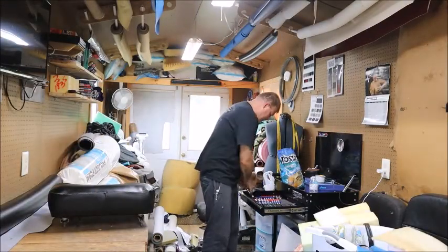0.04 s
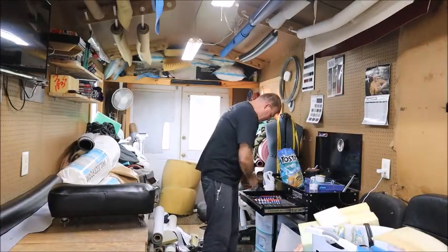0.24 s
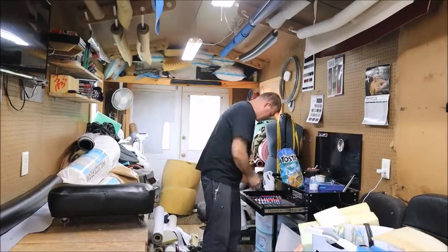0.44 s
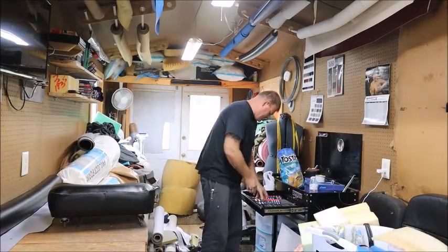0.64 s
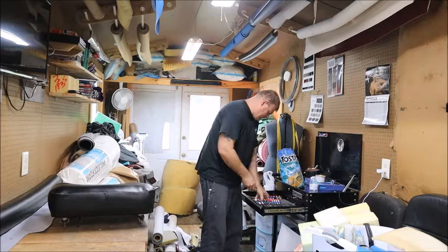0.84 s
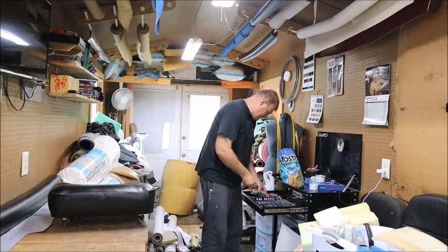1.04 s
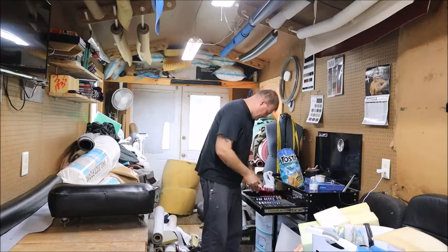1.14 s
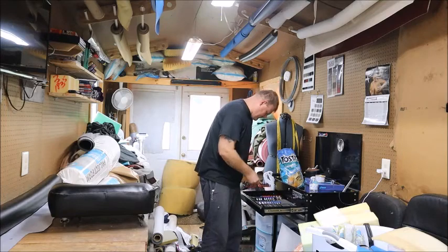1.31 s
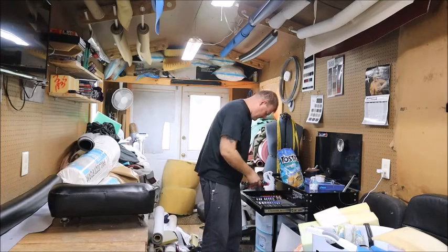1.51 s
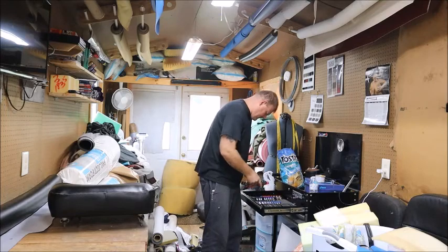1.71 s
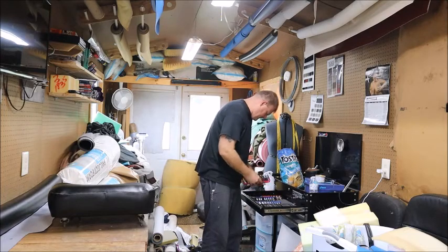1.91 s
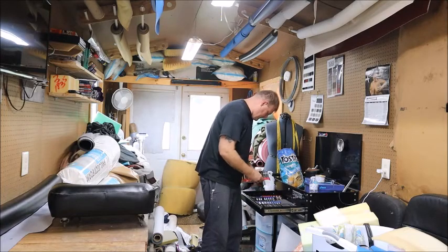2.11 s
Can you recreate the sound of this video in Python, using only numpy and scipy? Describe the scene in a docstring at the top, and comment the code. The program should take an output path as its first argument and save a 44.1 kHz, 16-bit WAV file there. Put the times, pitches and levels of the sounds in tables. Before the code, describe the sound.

Metal tools crash in a chest drawer in one quick rattling burst, then a dull knock, then sparse bright clicks of small steel tools being picked over, with short room echo and soft low bumps, heard from a few metres.

```python
"""Someone works at a steel tool chest in a small, cluttered workshop, a few metres away.
A steady hush (filtered noise) and low bumps (fading sine waves) run all through. After a faint dull knock
(a short noise burst) a drawer bangs and its tools crash: noise bursts with ringing steel tones on top.
More dull knocks come later, and in the second half small steel tools clink as they are picked over:
bright clicks with short notes. The drawer, knocks and clinks echo briefly in the room."""
import sys
import numpy as np
from scipy import signal
from scipy.fft import rfft, irfft, next_fast_len
from scipy.io import wavfile
from scipy.ndimage import uniform_filter1d, minimum_filter1d

SR = 44100
rng = np.random.default_rng(int(sys.argv[2]) if len(sys.argv) > 2 else 0)


def wav_out(sig):
    """Save sig, one row per channel (or a flat mono array), as 16-bit PCM at SR to the path in sys.argv[1]."""
    wavfile.write(sys.argv[1], SR, np.round(np.clip(np.atleast_2d(sig).T, -1, 1) * 32767).astype(np.int16))


N = 94815  # length in samples
RING = int(0.5 * SR)  # longest single sound, in samples
AGE = np.arange(RING) / SR  # seconds since a sound began

# steady room noise: pitch_hz, level_db (per Hz)
HUSH_COLOUR = [(15, -37), (25, -2), (122, -1), (221, -7.5), (509, -13), (703, -9.5), (782, -12),
               (1340, -18), (1530, -18.5), (2120, -20.5), (2490, -21), (2770, -19.5), (3000, -22),
               (4380, -22.5), (15500, -29)]
HUSH_DB = -49.5

# low thuds of the chest and soft bumps of movement: start_s, level_db, pitch_hz, t60_s
BUMPS = [(0.176, -40, 106, 0.028), (0.286, -27, 138, 0.064), (.308, -25.5, 146.3, 0.12),
         (0.323, -30, 45.7, 0.64), (0.549, -40.5, 107, 0.76), (0.598, -39, 48.6, 0.14),
         (0.828, -47.5, 129, 0.027), (0.862, -42.5, 86, 0.023), (1.216, -49, 85, 0.024),
         (1.317, -49.5, 74, 0.15), (1.349, -40, 47, 0.25), (1.479, -49, 99, 0.04),
         (1.707, -42.5, 81.5, 0.084), (1.718, -50, 183, 0.18), (1.841, -50, 63.6, 0.048),
         (1.897, -42, 89, 0.04)]
BUMP_RISE_S = 0.00127

# dull knocks on the drawer: start_s, level_db
KNOCKS = [(.178, -58), (0.6886, -55), (0.6927, -44.5)]
# tone colour of a knock: pitch_hz, level_db (per Hz)
KNOCK_COLOUR = [(200, -13), (700, -2), (1100, 8.5), (1700, -3.5), (2900, -5.5), (6000, -21.5),
                (14000, -35.5)]
KNOCK_T60_S = 0.037

# blows of the drawer and its load: start_s, level_db, tilt_db (per octave), lower_edge_hz,
# chatter_t60_s, note_hz (of the struck panel or tool), note_level_db
DRAWER_BLOWS = [(0.2084, -30, 0.5, 402, 0.078, 430, -4), (0.2105, -12.5, 1.6, 590, 0.056, 424, -6.5),
                (.2152, -14, 0.5, 610, 0.04, 445.5, -2.5), (.2205, -11, -1.5, 330, 0.096, 1120, -12.5),
                (.2315, -15, -0.5, 250, 0.04, 950, -17), (0.243, -15.5, -5, 218, .06, 770, -6),
                (0.2636, -17.5, 5.5, 200, 0.17, 1093, -6.5), (0.2875, -14, 0.5, 119, 0.079, 1580, -8),
                (0.2924, -15.5, 2.5, 141, 0.15, 2532, -1.5), (0.3102, -6.5, -0.5, 253, 0.037, 1396, -6),
                (0.3158, -10.5, 2.5, 298, 0.1, 534, -7), (0.3233, -14.5, 1.5, 350, 0.076, 908, -10),
                (.3285, -15, -3, 354, 0.044, 2750, -6), (.3375, -15, -2, 346, 0.051, 1273, -3.5),
                (0.3465, -18.5, -0.5, 346, .07, 1172, -8), (0.3522, -16, 1, 360, 0.077, 1813, -8.5)]
# tone colour of a blow: pitch_hz, level_db (per Hz)
BLOW_COLOUR = [(60, -13.5), (140, 1), (250, -5.5), (370, -4), (600, -5.5), (760, 2.5), (1150, -2),
               (1800, -2.5), (2800, -3.5), (4500, -11), (8500, -23.5), (10500, -31), (12500, -43),
               (15500, -47.5)]
# ringing tones (modes) of the steel drawer: pitch_hz, level_db, t60_s
DRAWER_MODES = [(354, -2, 0.15), (413, 2, .18), (509.5, 0, 0.21), (790, -4, 0.31), (996, 0.5, .24),
                (1054, 0, 0.2), (1156, 3, 0.22), (1568, -3.5, 0.13)]
DRAWER_SPREAD = 0.018  # random pitch change of each mode, as a share of its pitch
SHEET_DB, LOAD_DB, LOAD_T60_S = -9.5, -8.5, 0.1
PANEL_RISE_S, PANEL_T60_S = 0.0011, 0.055
LOW_SLOPE_DB = -11.5  # per octave, for two octaves below the lower edge

# hits on a loose spanner in the load: start_s, level_db
SPANNER_HITS = [(.2636, -27.5), (.29, -35.5), (.3235, -29.5)]
# ringing tones of that spanner: pitch_hz, level_db, t60_s
SPANNER_MODES = [(4890, -14, 0.13), (6340, -2.5, 0.066), (6600, -9, 0.064), (8170, 5, 0.098),
                 (8360, 1, 0.0714), (8900, -1.5, 0.056)]

# small tools touching: start_s, level_db, tilt_db (per octave), upper_edge_hz (of the click),
# note_hz (of the struck tool), note_level_db
CLINKS = [(1.024, -56, -8, 10100, 8050, -8), (1.2, -53.5, -5, 7600, 5900, -9),
          (1.254, -38, -3.5, 9000, 13730, -14), (1.2567, -34.5, -1.5, 8100, 14900, -8),
          (1.2642, -34, -0.5, 9000, 11600, -13), (1.381, -40.5, -5.5, 8500, 11500, -12),
          (1.384, -33.5, -4, 8900, 15000, -14), (1.421, -39, -3.5, 8400, 11800, -18),
          (1.4244, -32, -1, 8200, 7090, -11), (1.4464, -39, -3, 9800, 14950, -17),
          (1.4878, -35.5, -7, 7960, 3106, -13), (1.496, -27.5, -1.5, 8300, 13720, -21),
          (1.5026, -36, -2.5, 7950, 11650, -11.5), (1.5097, -30.5, -1.5, 8100, 11800, -22),
          (1.7839, -39, 1.5, 10300, 8300, -10), (1.804, -55, 9, 9500, 5950, -4),
          (1.9447, -43, -1.5, 9300, 3750, -7.5), (1.949, -47.5, -4, 9100, 7100, 1.5),
          (2.001, -55.5, -4, 8000, 3760, -13)]
# tone colour of a clink: pitch_hz, level_db (per Hz)
CLINK_COLOUR = [(400, -37.5), (1000, -28.5), (1750, -13.5), (2400, -14.5), (3200, -5.5), (4600, -1.5),
                (5600, 0.5), (7100, 1.5), (8600, 2), (10300, -6), (11600, -0.5), (12600, -10), (13700, -2),
                (15500, -11)]
CLINK_T60_S = 0.082
EDGE_START, EDGE_END, EDGE_DB = 0.85, 1.17, -15.5  # the click falls away between these shares of its edge
# lower ringing tones shared by the small tools: pitch_hz, level_db, t60_s
TOOL_MODES = [(1770, -7, 0.067), (3080, 0.5, 0.072), (3760, -9, 0.15), (5340, -9, 0.14), (5680, 5, 0.12),
              (6130, 8.5, 0.095), (6550, 4, 0.15), (7000, -14, 0.23)]
TOOL_MODES_DB, TOOL_SPREAD = -7.5, 0.0149  # the spread is a share of each pitch
TOOL_T60_S, NOTE_WIDTH_HZ = 0.065, 85

# noise bursts of every contact
RATTLE_DB, RATTLE_STEP_S, TICK_DB = 3.5, 0.0012, -10
EVEN_HZ = 260  # width over which a burst's spectrum is levelled

# how long the room rings at each pitch: pitch_hz, t60_s
ROOM_T60 = [(100, 0.62), (500, 0.32), (1000, 0.26), (2500, 0.21), (6000, 0.2), (15000, 0.25)]
ROOM_DB, ROOM_GAP_S, ROOM_BUILD_S = -7, 0.0055, 0.002

# gain control, limiter and treble cut
DUCK_ABOVE_DB, DUCK_SHARE, RELEASE_DB_PER_S = -19, 0.15, 45
CEILING, TOP_HZ = 0.98, 15800


def amp(db):
    """Turn decibels into gain."""
    return 10 ** (np.asarray(db) / 20)


def unit(x):
    """Scale a sound to a total energy of one."""
    return x / np.sqrt(np.sum(x ** 2))


def fade(t60):
    """Smooth decay that loses 60 dB in t60 seconds."""
    return np.exp(-np.log(1000) * AGE / t60)


def colour(x, points, tilt_db=0):
    """Filter through (Hz, dB) points, tilted per octave, with no sound ahead of the input."""
    size = next_fast_len(2 * len(x), True)
    size += size % 2
    octave = np.log2(np.maximum(np.arange(size // 2 + 1) * SR / size, 10))
    hz, db = np.array(points).T
    curve_db = np.interp(octave, np.log2(hz), db)
    curve_db = curve_db + tilt_db * np.clip(octave, np.log2(hz[0]), np.log2(hz[-1]))
    # folding the cepstrum gives the filter its minimum phase
    cepstrum = irfft(np.log(amp(curve_db)))
    cepstrum[1:size // 2] *= 2
    cepstrum[size // 2 + 1:] = 0
    return irfft(rfft(x, size) * np.exp(rfft(cepstrum)))[:len(x)]


def even(x):
    """Level out the broad humps of a noise burst; its fine resonances stay."""
    spectrum = rfft(x, 2 * RING)
    power = uniform_filter1d(np.abs(spectrum) ** 2, size=int(EVEN_HZ * 2 * RING / SR))
    return unit(irfft(spectrum / np.sqrt(power + 1e-18))[:RING])


def add(track, start_s, level_db, sound):
    """Mix in a sound; for unit energy, level_db is its level when spread over 20 ms."""
    start = int(start_s * SR)
    part = sound[:len(track) - start]
    track[start:start + len(part)] += part * amp(level_db) * np.sqrt(SR / 50)


def contact(t60):
    """A sharp tick plus a fading noise chatter whose loudness jumps in small steps."""
    step = (AGE / RATTLE_STEP_S).astype(int)
    loudness = rng.standard_normal(RING)[step]
    chatter = rng.standard_normal(RING) * amp(RATTLE_DB * np.clip(loudness, -2, 2))
    hit = unit(chatter * fade(t60))
    hit[0] += amp(TICK_DB)
    return even(hit)


def note(hz, t60):
    """One ringing tone that dies away."""
    return unit(np.sin(2 * np.pi * hz * AGE) * fade(t60))


def ring(modes, spread=0):
    """Several ringing tones of one object; each blow excites them a little differently."""
    total = np.zeros(RING)
    for hz, level_db, t60 in modes:
        level_chance, pitch_chance = rng.standard_normal(2)
        wave = np.sin(2 * np.pi * hz * (1 + spread * pitch_chance) * AGE)
        total += amp(level_db + 2 * level_chance) * np.sign(pitch_chance) * wave * fade(t60)
    return unit(total)


def hush():
    """Steady room noise: random noise filtered to be strongest in the bass."""
    return unit(colour(rng.standard_normal(N), HUSH_COLOUR)) * np.sqrt(N) * amp(HUSH_DB)


def bumps():
    """Low thuds and soft pushes: sine waves that rise quickly and die away."""
    out = np.zeros(N)
    for start_s, level_db, hz, t60 in BUMPS:
        rise = 1 - np.exp(-AGE / BUMP_RISE_S)
        add(out, start_s, level_db, unit(np.sin(2 * np.pi * hz * AGE) * fade(t60) * rise))
    return out


def knocks():
    """Light, dull contacts with the drawer: short noise bursts with little treble."""
    out = np.zeros(N)
    for start_s, level_db in KNOCKS:
        add(out, start_s, level_db, unit(colour(contact(KNOCK_T60_S), KNOCK_COLOUR)))
    return out


def jostled(count):
    """Each blow shakes other tools of the load: a new handful of unrelated rings."""
    total = np.zeros(RING)
    for hz in np.exp(rng.uniform(np.log(700), np.log(7000), count)):
        total += rng.standard_normal() * note(hz, LOAD_T60_S)
    return unit(total)


def drawer():
    """Each blow rattles the load and rings the sheet steel and the part it strikes."""
    out = np.zeros(N)
    for start_s, level_db, tilt_db, low_hz, t60, note_hz, note_db in DRAWER_BLOWS:
        blow = unit(colour(contact(t60), BLOW_COLOUR, tilt_db))
        blow += amp(SHEET_DB) * ring(DRAWER_MODES, DRAWER_SPREAD)
        blow += amp(LOAD_DB) * jostled(count=24)
        blow = colour(blow, [(low_hz / 4, 2 * LOW_SLOPE_DB), (low_hz, 0)])
        struck = unit(note(note_hz, PANEL_T60_S) * (1 - np.exp(-AGE / PANEL_RISE_S)))
        add(out, start_s, level_db, blow + amp(note_db) * struck)
    return out


def spanner():
    """A loose spanner in the load chimes with its own high ringing tones."""
    out = np.zeros(N)
    for start_s, level_db in SPANNER_HITS:
        add(out, start_s, level_db, ring(SPANNER_MODES))
    return out


def cluster(hz, count):
    """A rattling tool's note: tones close in pitch that beat together and die quickly."""
    total = np.zeros(RING)
    for size, offset in rng.standard_normal((count, 2)):
        total += size * note(hz + NOTE_WIDTH_HZ * offset, TOOL_T60_S)
    return unit(total)


def small_tools():
    """Bright, short touches of steel on steel; each leaves a brief note of the touched tool."""
    out = np.zeros(N)
    for start_s, level_db, tilt_db, edge_hz, note_hz, note_db in CLINKS:
        click = colour(contact(CLINK_T60_S), CLINK_COLOUR, tilt_db)
        click = colour(click, [(EDGE_START * edge_hz, 0), (EDGE_END * edge_hz, EDGE_DB)])
        clink = unit(click) + amp(TOOL_MODES_DB) * ring(TOOL_MODES, TOOL_SPREAD)
        clink += amp(note_db) * cluster(note_hz, count=8)
        add(out, start_s, level_db, clink)
    return out


def workshop(x):
    """Direct sound plus a short echoing tail of noise that fades at its own rate in each band."""
    hz, t60 = np.array(ROOM_T60).T
    noise = rfft(rng.standard_normal(RING))
    log_hz = np.log(np.maximum(np.arange(len(noise)) * SR / RING, 1))
    tail = np.zeros(RING)
    # each row of the identity matrix picks one band, blending into its neighbours
    for band, band_t60 in zip(np.eye(len(hz)), t60):
        share = np.interp(log_hz, np.log(hz), band)
        tail += irfft(noise * share, RING) * fade(band_t60)
    build = 1 - np.exp(-np.maximum(AGE - ROOM_GAP_S, 0) / ROOM_BUILD_S)
    response = amp(ROOM_DB) * unit(tail * build)
    response[0] += 1  # the direct sound
    return signal.fftconvolve(x, even(response))[:N]


def scene():
    """The tool chest heard through the room, with the bumps and hush added directly."""
    chest = workshop(knocks() + drawer() + spanner() + small_tools())
    return (hush() + bumps() + chest)[None]


def record(dry):
    """Gain control ducks on loud blows and recovers slowly, a limiter holds peaks, the top is cut."""
    released = RELEASE_DB_PER_S * np.arange(N) / SR
    level_db = 20 * np.log10(np.abs(dry) + 1e-9)
    # the held level jumps up at once and sinks at the release rate
    held_db = np.maximum.accumulate(level_db + released, axis=-1) - released
    ducked = dry * amp(-DUCK_SHARE * np.maximum(held_db - DUCK_ABOVE_DB, 0))
    limit = CEILING / np.maximum(np.abs(ducked), CEILING)
    gain = uniform_filter1d(minimum_filter1d(limit, size=89), size=89)  # about 2 ms
    treble_cut = signal.ellip(8, 0.2, 70, TOP_HZ, fs=SR, output="sos")
    return signal.sosfilt(treble_cut, ducked * gain)


dry = scene()
out = record(dry)
wav_out(out)
```